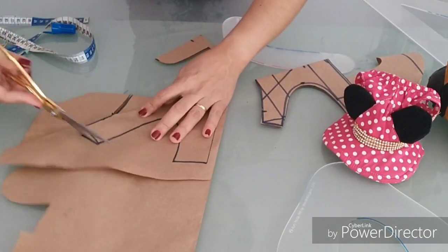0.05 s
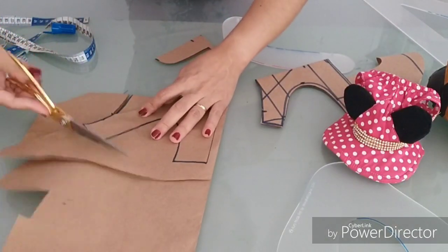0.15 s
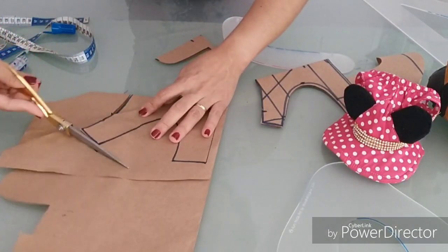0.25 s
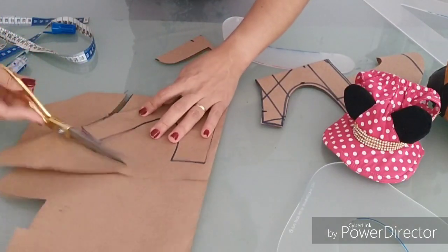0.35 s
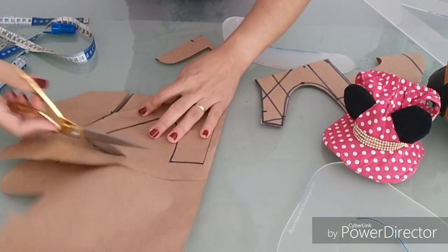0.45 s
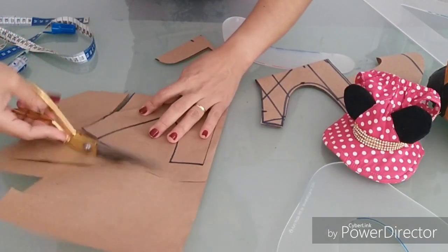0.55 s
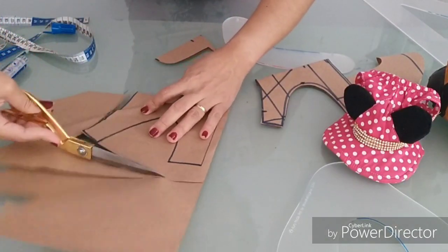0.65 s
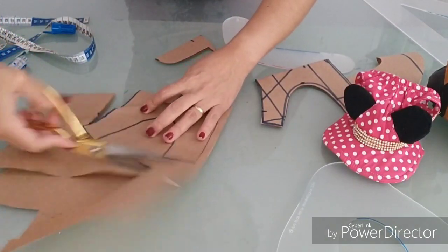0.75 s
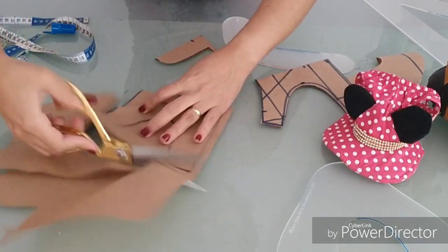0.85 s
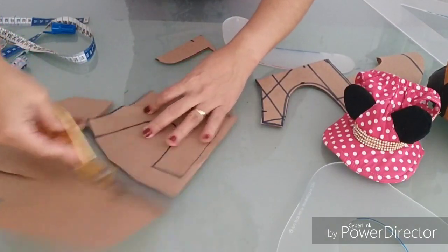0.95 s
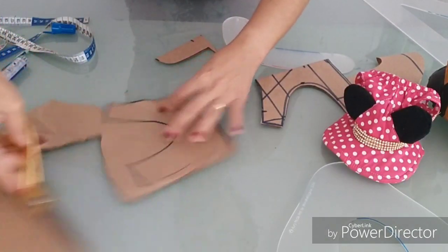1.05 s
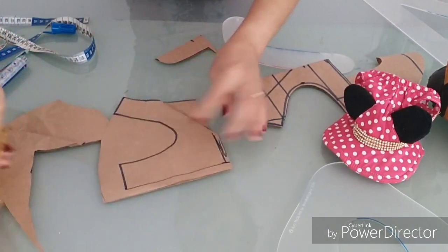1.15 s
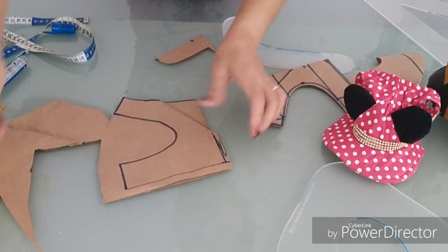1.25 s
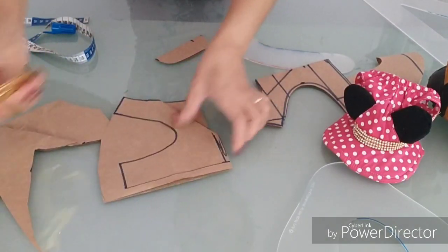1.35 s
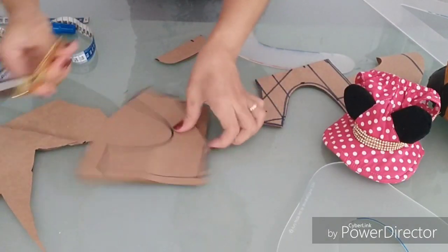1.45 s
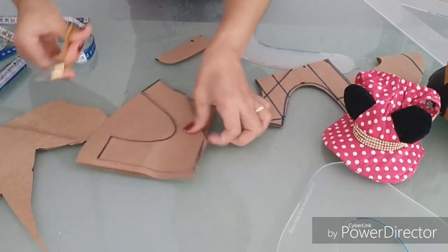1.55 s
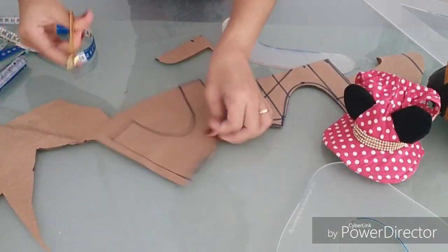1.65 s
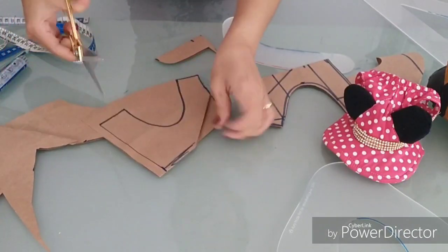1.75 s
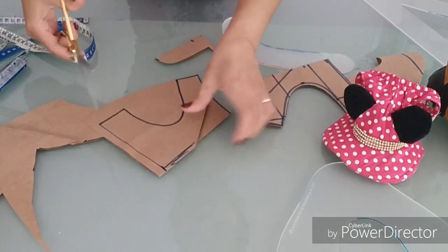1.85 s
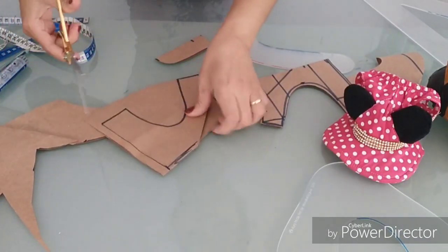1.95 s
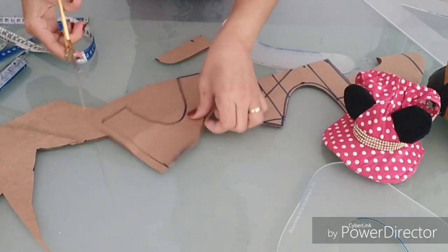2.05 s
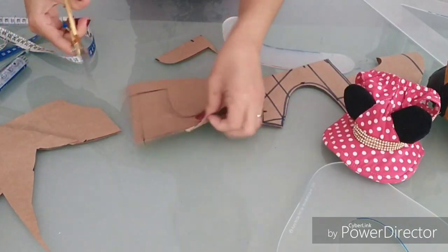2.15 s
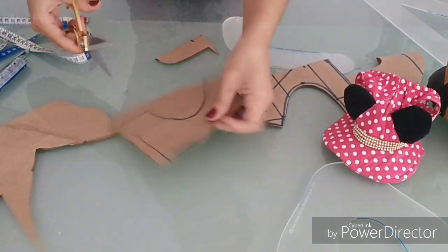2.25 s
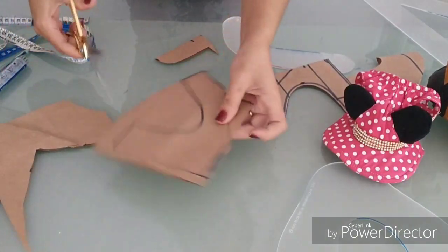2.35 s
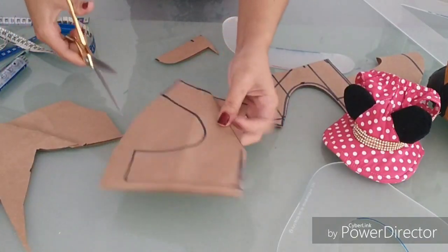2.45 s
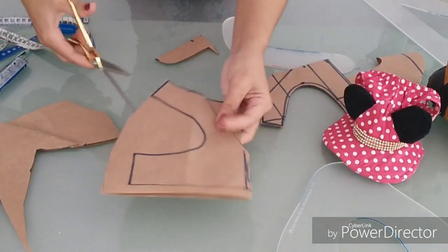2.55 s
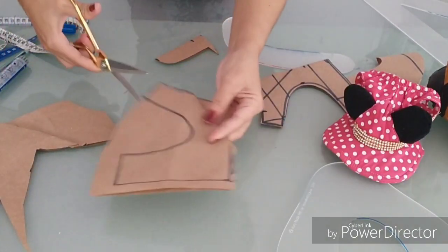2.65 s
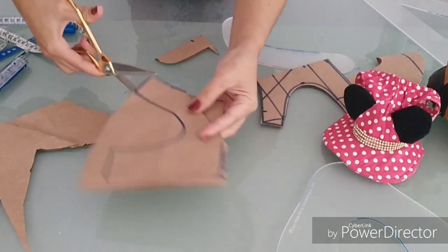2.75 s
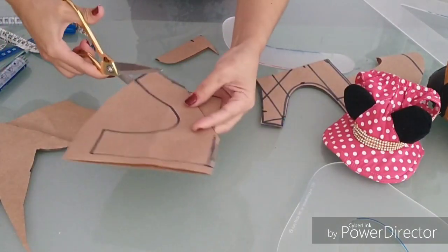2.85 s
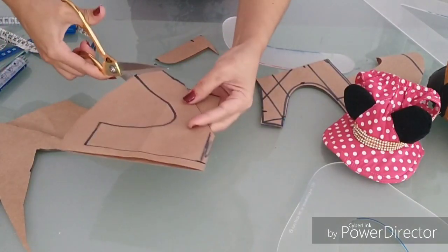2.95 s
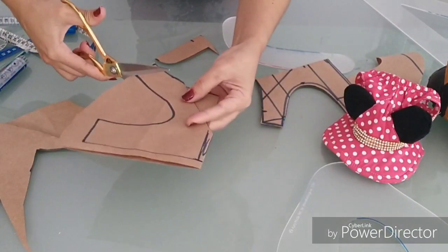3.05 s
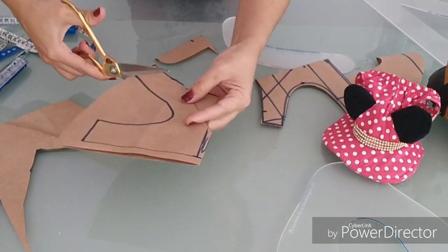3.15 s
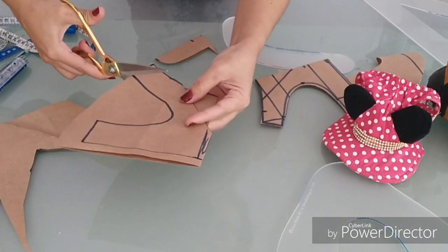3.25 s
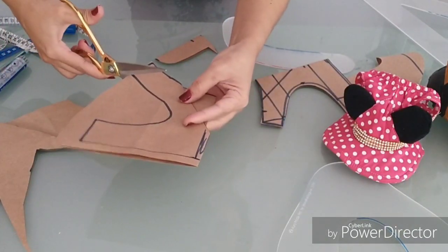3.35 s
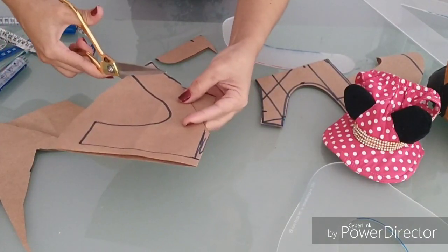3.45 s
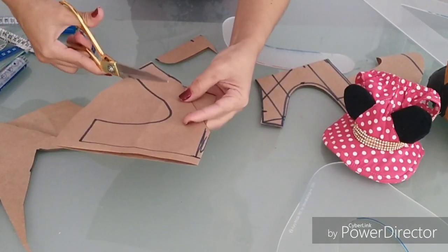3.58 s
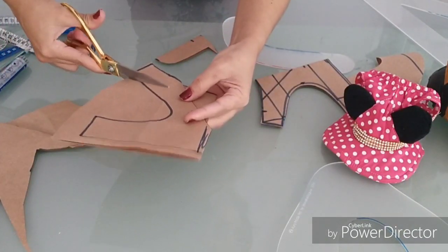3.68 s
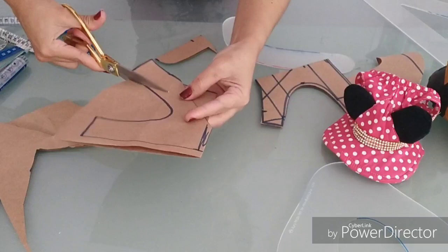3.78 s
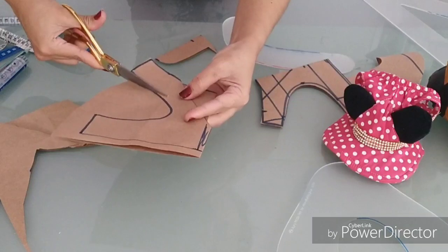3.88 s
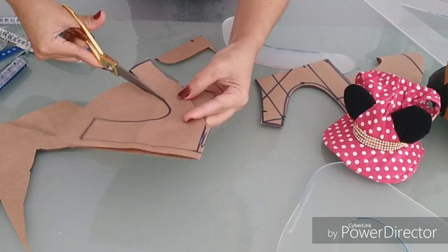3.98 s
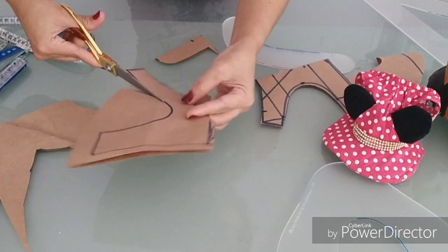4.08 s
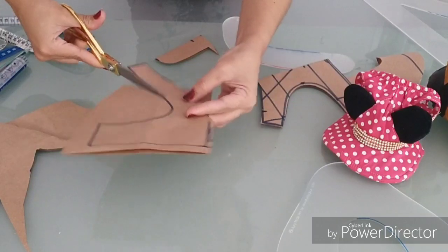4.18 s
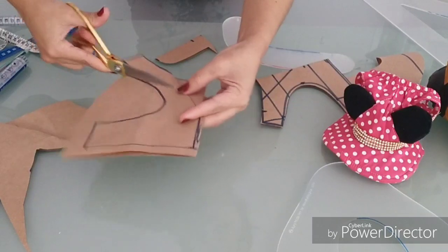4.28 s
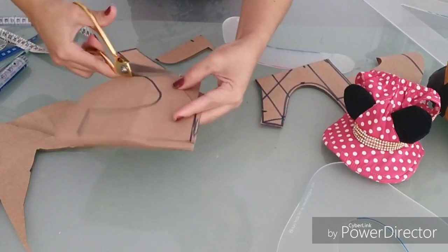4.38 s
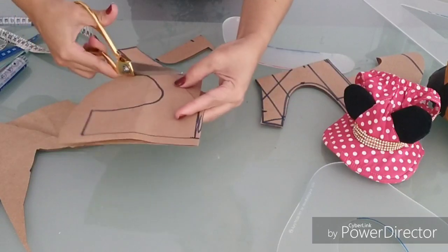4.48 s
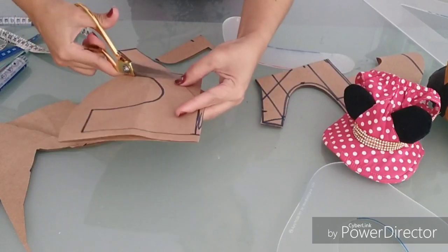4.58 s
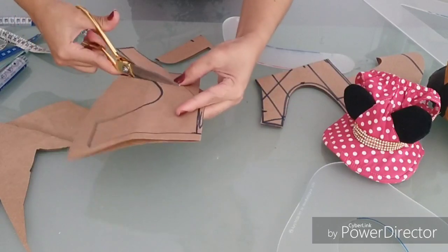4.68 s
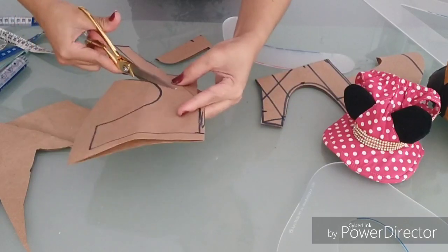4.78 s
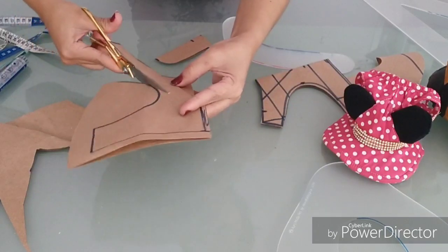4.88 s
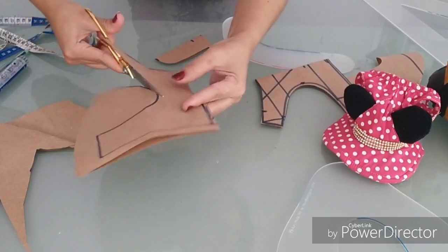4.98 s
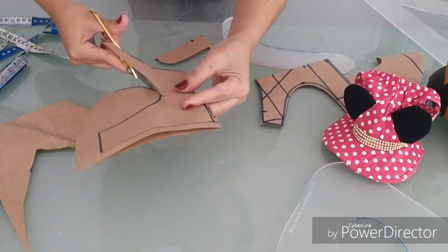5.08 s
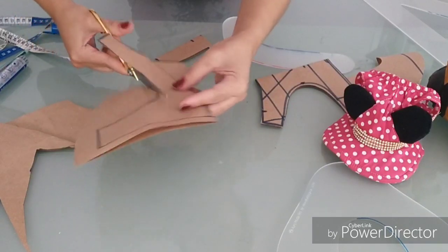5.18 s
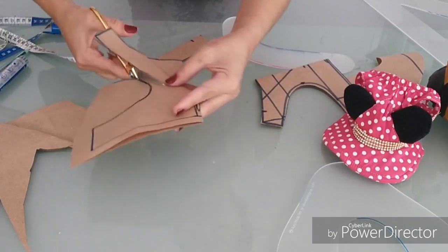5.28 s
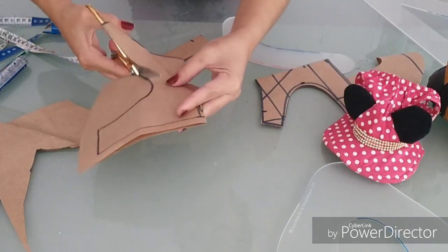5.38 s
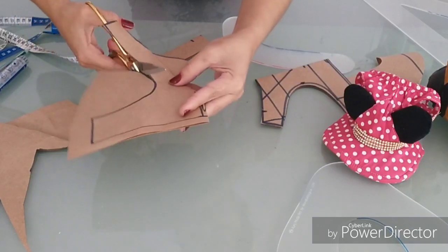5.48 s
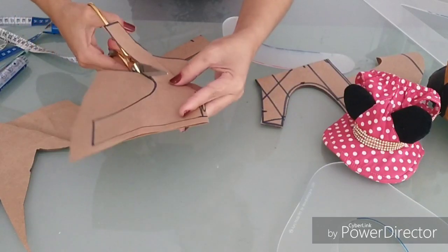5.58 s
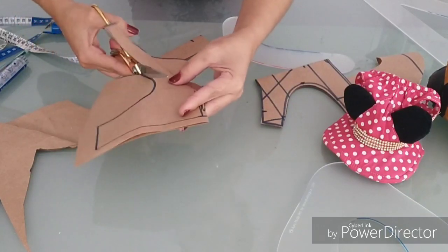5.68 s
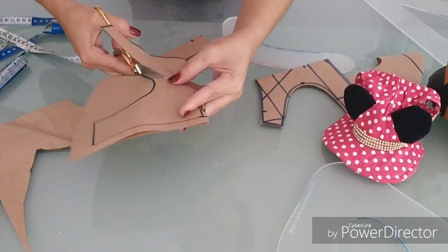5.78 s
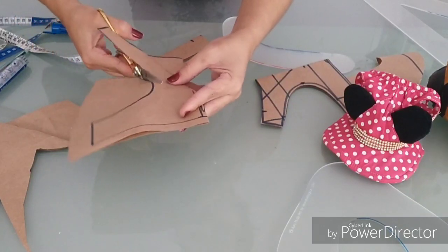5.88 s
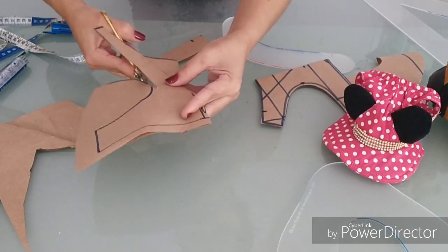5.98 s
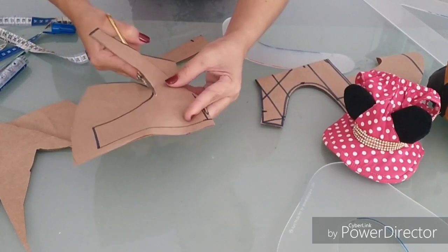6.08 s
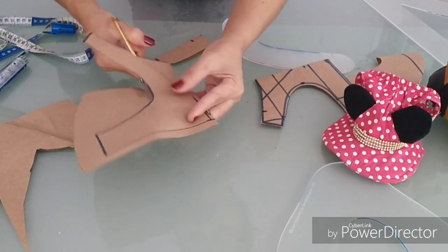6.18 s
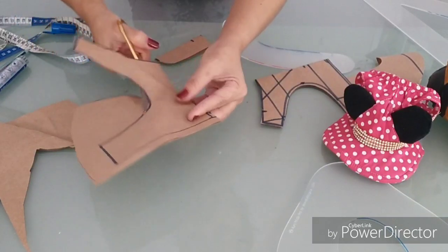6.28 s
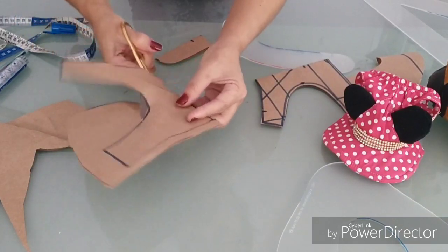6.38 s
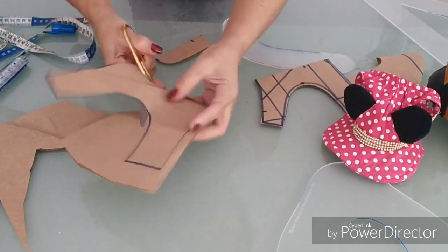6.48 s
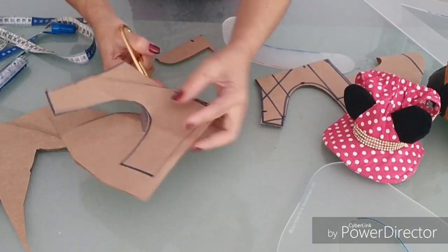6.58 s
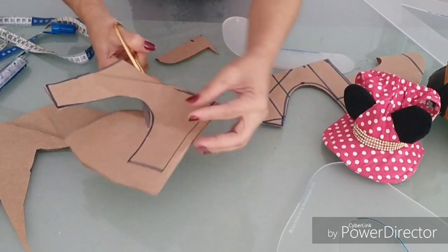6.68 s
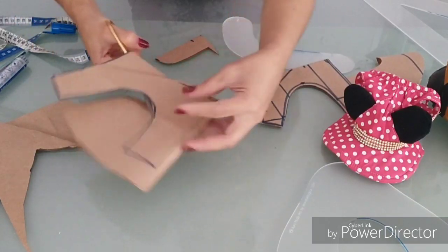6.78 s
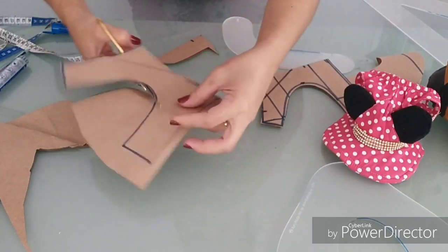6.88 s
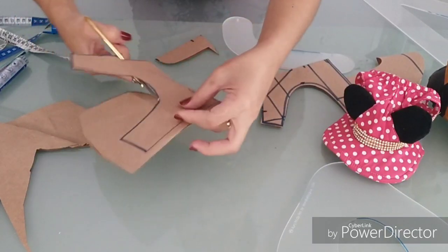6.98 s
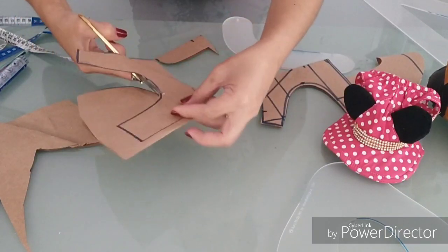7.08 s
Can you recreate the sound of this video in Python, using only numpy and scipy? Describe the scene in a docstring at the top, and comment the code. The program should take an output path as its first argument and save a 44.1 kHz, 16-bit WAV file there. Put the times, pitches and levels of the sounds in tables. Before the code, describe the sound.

Close up in a small room with soft hiss and faint fan-like hum, a stiff paper sheet rustles across a table and is sheared by three hard snips, a sharp knock with them. The offcut is brushed away, empty scissors click and rasp, the piece is handled quietly, and finally slow snips crunch gently in groups, with small paper snaps and thin metallic glides.

```python
"""Steel scissors cut folded kraft paper on a glass-topped table in a small, faintly humming room.
First the sheet slides and three hard cuts part it (fibre noise through sheet and table resonances);
the offcut is swept aside (rubbing noise); the empty blades are worked in the air (scrapes, ticks).
The piece is lifted with soft rubbing, a faint rumble passes, and slow cuts trim it with a soft crunch
(sparser fibre noise, jerks and crackles), between glides of the blades along the cut edge."""
import sys
import numpy as np
from scipy import signal
from scipy.fft import rfft, irfft
from scipy.io import wavfile

SR = 44100
rng = np.random.default_rng(int(sys.argv[2]) if len(sys.argv) > 2 else 0)


def master(y):
    """Save y as 16-bit WAV."""
    cut = np.clip(np.atleast_2d(y).T, -1, 1)
    pcm = np.round(cut * 32767)  # scale
    wavfile.write(sys.argv[1], SR, pcm.astype(np.int16))


N = 314251


def from_db(db):
    """Decibels to gain."""
    return 10 ** (np.asarray(db) / 20)


def rms_one(x):
    """Scale to unit rms."""
    return x / np.sqrt(np.mean(x ** 2) + 1e-20)


def at_hz(points, hz):
    """Read a table on a log-frequency axis."""
    knots, values = np.transpose(points)
    return np.interp(np.log(np.maximum(hz, 1)), np.log(knots), values)


def drift(knots_per_s):
    """Smooth chance: Gaussian knots joined by lines, unit rms."""
    knots = rng.standard_normal(N // 20)
    return rms_one(np.interp(np.arange(N) / SR * knots_per_s, np.arange(len(knots)), knots))


def resonate(x, hz, width_hz):
    """Two-pole resonance with gain 1 on top."""
    r = np.exp(-np.pi * width_hz / SR)
    zeros = np.array([1, 0, -1]) * (1 - r * r) / 2
    poles = [1, -2 * r * np.cos(2 * np.pi * hz / SR), r * r]
    return signal.lfilter(zeros, poles, x + 1e-18)


def resonate_twice(x, hz, stage_width_hz):
    """Two equal resonances in series: steeper skirts."""
    return resonate(resonate(x, hz, stage_width_hz), hz, stage_width_hz)


def butter(x, hz, kind, order=2):
    """Butterworth filter."""
    return signal.sosfilt(signal.butter(order, hz, kind, fs=SR, output="sos"), x)


def coloured(x, spectrum, size=4096):
    """Causal (minimum-phase) filter with the given spectrum."""
    hz = np.arange(size // 2 + 1) * SR / size
    cepstrum = irfft(np.log(from_db(at_hz(spectrum, hz))))
    # fold the cepstrum onto positive time
    cepstrum[1:size // 2] *= 2
    cepstrum[size // 2 + 1:] = 0
    impulse = irfft(np.exp(rfft(cepstrum)))
    return signal.fftconvolve(x, impulse)[:N]


def envelope(start, length, swell_db, attack_s, release_s):
    """A stroke sets in, swells or fades evenly while it lasts, then dies away."""
    age = np.maximum(np.arange(N) / SR - start, 0)
    rise = 1 - np.exp(-(age / attack_s) ** 2)
    fall = np.exp(-np.minimum(np.maximum(age - length, 0) / release_s, 20))
    return rise * fall * from_db(swell_db * (np.minimum(age / length, 1) - .5))


def strokes(rows, attack_s, release_s, lead_s=0):
    """Gains of body and hiss over a series of strokes; the hiss may set in earlier."""
    body_power, hiss_power = 0, 0
    for start, length, db, swell_db, hiss_db in rows:
        body = from_db(db) * envelope(start, length, swell_db, attack_s, release_s)
        early = from_db(db) * envelope(start - lead_s, length + lead_s, swell_db, attack_s, release_s)
        body_power = body_power + body ** 2
        hiss_power = hiss_power + (from_db(hiss_db) * early) ** 2
    return np.sqrt(body_power), np.sqrt(hiss_power)


def fibres(per_s, spread_db, clump_db, clump_rate, rub_db):
    """Fibres break or slip at random, over smooth rubbing noise, both waxing and waning in clumps."""
    sizes = from_db(spread_db * np.clip(rng.standard_normal(N), -2, 2)) * rng.choice([-1, 1], N)
    breaks = rms_one(sizes * (rng.random(N) < per_s / SR))
    rub = from_db(rub_db) * rng.standard_normal(N)
    clumps = from_db(clump_db * np.clip(drift(clump_rate), -2, 2))
    return (breaks + rub) * clumps


def with_modes(force, modes):
    """Raise or lower the force by the listed dB at each mode."""
    return force + sum((from_db(db) - 1) * resonate(force, hz, width) for hz, width, db in modes)


def play(gains, force, colour, splits_hz):
    """The contact force rings through its colour; each register follows its own gain."""
    rest, registers = coloured(force, colour), []
    for hz in splits_hz:
        registers.append(butter(butter(rest, hz, "low"), hz, "low"))
        rest = butter(butter(rest, hz, "high"), hz, "high")
    registers.append(rest)
    return sum(gain * rms_one(x) for gain, x in zip(gains, registers))


# air noise spectrum: f/Hz, relative density/dB
AIR_COLOUR = [(25, -18), (60, -7), (140, -0.5), (280, -11), (900, -9), (1300, -14), (3200, -23.5),
              (5000, -21.5), (6700, -23.5), (9000, -18), (11000, -8), (13000, -16.5), (15500, -31)]
# wavering hum resonances: f/Hz, half stage width/Hz, rms level/dB
HUM_RESONANCES = [(166, 33, -82), (406, 29.5, -72), (537.3, 8.05, -77.5), (689, 27.3, -76.5),
                  (773.5, 12, -69.5), (851, 7.6, -72.5)]
# steady hum tones: f/Hz, rms level/dB
HUM_TONES = [(782, -73), (841, -75.5)]
# passing rumble: t/s, length/s, level/dB, f/Hz, stage width/Hz
RUMBLE = (3.5, 0.8, -75, 55, 25)
AIR_DB = -63.5


def room_tone():
    """Soft hiss, a fan-like hum of narrow noise around two steady tones, and a passing rumble."""
    air = from_db(AIR_DB) * rms_one(coloured(rng.standard_normal(N), AIR_COLOUR))
    hum = 0
    for hz, half_width, db in HUM_RESONANCES:
        hum = hum + from_db(db) * rms_one(resonate_twice(rng.standard_normal(N), hz, 2 * half_width))
    for hz, db in HUM_TONES:
        hum = hum + from_db(db) * rms_one(np.sin(2 * np.pi * hz * np.arange(N) / SR))
    start, length, db, hz, width = RUMBLE
    rumble = from_db(db) * rms_one(resonate_twice(rng.standard_normal(N), hz, width))
    return air + hum + rumble * envelope(start, length, swell_db=-1, attack_s=0.23, release_s=.2)


# room decay: f/Hz, t60/s
ROOM_T60 = [(150, 0.58), (800, 0.51), (2000, 0.34), (5000, 0.38), (14000, 0.36)]
ROOM_BUILD_S = 0.0015


def room_tail(size=32768):
    """A diffuse noise tail whose bass lingers longest; energy 1."""
    t, hz = np.arange(size) / SR, np.arange(size // 2 + 1) * SR / size
    noise, tail = rfft(rng.standard_normal(size)), 0
    for band_hz, t60 in ROOM_T60:
        share = at_hz([(f, float(f == band_hz)) for f, _ in ROOM_T60], hz)
        tail = tail + irfft(noise * share) * from_db(-60 * t / t60)
    build = 1 - np.exp(-(t / ROOM_BUILD_S) ** 2)
    return rms_one(tail * build) / np.sqrt(size)


ROOM_DB, MOVES_PER_S = -6, 9


def room(x, count=3):
    """Sheet and blades keep moving, so their sound wanders between several sets of reflections."""
    shares = np.array([drift(MOVES_PER_S) for _ in range(count)])
    shares /= np.sqrt(np.sum(shares ** 2, axis=0))
    reflections = sum(signal.fftconvolve(x * share, room_tail())[:N] for share in shares)
    return x + from_db(ROOM_DB) * reflections


# soft rubbing of fingers on the piece, and of blades entering the paper at 3.525 s:
# t/s, length/s, level/dB, swell/dB, hiss re level/dB
SOFT_RUBS = [(2.37, 0.2, -64.5, -2, 4.5), (2.51, 0.32, -66, 6, 4.5), (2.765, 0.025, -51, -9, 4),
             (2.815, 0.065, -67, -4, 18), (2.9, 0.19, -76.5, 4, 11.5), (3.525, 0.24, -58, 10, 0.5),
             (5.71, 0.086, -60, 4.5, -0.5), (5.82, 0.24, -68, 6, 6)]
# soft-rubbing spectrum: f/Hz, relative density/dB
SOFT_COLOUR = [(530, -70), (900, -0.5), (1190, -3.5), (1370, -1), (1880, 0), (3190, -19), (4520, -2.5),
               (5100, -3.5), (7490, -4.5), (11600, 2.5), (13700, -1.5), (16000, -15)]


def soft_rubs():
    """Fingers on the piece, once blades entering it, rub softly: dense slips over weak smooth noise."""
    force = fibres(per_s=3200, spread_db=2.5, clump_db=1.0, clump_rate=90, rub_db=-9.0)
    return play(strokes(SOFT_RUBS, attack_s=.018, release_s=0.049), force, SOFT_COLOUR, [4500])


# steel rubs steel as the empty blades open and close: t/s, length/s, level/dB, swell/dB, hiss re level/dB
SCRAPES = [(1.447, 0.014, -44.5, 2, -7), (1.487, 0.041, -57, 8, 11.5), (1.64, 0.03, -55, -4, 11.5),
           (1.675, 0.1, -49, -2.5, -5), (1.97, 0.11, -66.5, -5.5, 4.5), (2.125, .07, -75, 5, 20),
           (2.2, 0.17, -60, 16, 1), (2.333, 0.039, -50, -4, -3)]
# steel-on-steel spectrum: f/Hz, relative density/dB
SCRAPE_COLOUR = [(590, -24.5), (1000, -13), (1730, -9.5), (1870, -4.5), (2280, -12), (2740, -4.5),
                 (4680, -1.5), (8650, -13), (12400, -8.5), (14800, -19), (16000, -27)]


def scrapes():
    """Steel rubs on steel: dense, very uneven slips."""
    force = fibres(per_s=4400, spread_db=7.0, clump_db=2.0, clump_rate=290, rub_db=-3)
    return play(strokes(SCRAPES, attack_s=0.0043, release_s=0.026), force, SCRAPE_COLOUR, [6500])


# blades reopen and glide along the cut edge: t/s, length/s, level/dB, swell/dB, hiss re level/dB
GLIDES = [(4.228, .15, -54.5, 10.5, 6), (4.385, 0.058, -48, 6, 3), (5.21, 0.093, -52, 18, 3.5),
          (5.305, 0.048, -52.5, 0.5, 7.5), (5.455, .055, -52.5, -2.5, 1.5)]
# steel-on-edge spectrum: f/Hz, relative density/dB
GLIDE_COLOUR = [(260, -67), (450, -21), (530, -17), (607, -16.5), (856, -2.5), (1150, -6.5), (1400, -3.5),
                (2040, -4), (2580, -12), (4110, 4), (5380, 1), (8540, -1), (11300, 5), (14800, -0.5),
                (16000, -26)]


def glides():
    """Steel rubs along the cut edge: the densest slips, the hiss leading slightly."""
    force = fibres(per_s=6200, spread_db=6.5, clump_db=1.8, clump_rate=150, rub_db=0.0)
    gains = strokes(GLIDES, attack_s=0.023, release_s=0.037, lead_s=0.0042)
    return play(gains, force, GLIDE_COLOUR, [2700])


# the sheet slides over table and blades: t/s, length/s, level/dB, swell/dB, hiss re level/dB
SLIDES = [(0.0, 0.41, -47.5, 1, -0.5), (0.32, 0.083, -42.5, -8, -14.5), (0.408, .03, -37.5, -0.5, 0.5),
          (0.46, 0.15, -43, 2, 2.5), (0.705, 0.06, -40.5, 6, -18), (0.755, 0.084, -37.5, -3, 0.5),
          (0.815, 0.088, -33.5, -4, 3.5), (1.03, 0.018, -35.5, 3, -2.5), (1.09, 0.14, -51, -4.5, 5.5),
          (1.258, 0.053, -43.5, 9, -10)]
# paper-on-table spectrum: f/Hz, relative density/dB
SLIDE_COLOUR = [(150, -39.5), (250, -19.5), (393, -4), (484, -13.5), (547, -11.5), (938, -8.5), (1160, -9),
                (1260, -8.5), (1450, -1.5), (1910, 1), (6040, -2), (9010, -10.5), (10900, -2),
                (14900, -12.5), (16000, -10.5)]


def slides():
    """Paper rubs on table and blades: sparse slips under strong smooth noise."""
    force = fibres(per_s=1100, spread_db=3.0, clump_db=0.5, clump_rate=210, rub_db=3.5)
    return play(strokes(SLIDES, attack_s=0.015, release_s=.02), force, SLIDE_COLOUR, [6500])


# singing edges: t/s, half length to 1/e /s, f/Hz, glide/(octaves/s), width/Hz, level/dB
SQUEAKS = [(0.071, .015, 1500, -1.5, 96, -48), (0.272, 0.035, 1733, 1, 664, -34),
           (0.504, 0.065, 2883, -3.5, 1040, -38.5), (0.347, 0.039, 520, -0.5, 150, -49),
           (0.678, 0.014, 620, 5.5, 296, -41.5), (0.685, 0.026, 5260, 1.5, 1200, -32.5),
           (0.846, 0.023, 4590, -6.5, 1387, -30), (0.876, 0.01386, 1920, -2.5, 196.5, -25),
           (2.223, 0.019, 3940, -4.5, 600, -55.5), (2.976, .02, 4300, -2, 700, -56),
           (5.337, 0.038, 4090, 0, 1000, -47.5)]


def squeaks():
    """Stick-slip of a rubbing edge: a narrow noise band whose pitch slides with the contact point."""
    out = np.zeros(N)
    for s, half, hz, glide, width_hz, db in SQUEAKS:
        at = np.arange(max(0, int((s - .15) * SR)), int((s + .15) * SR))
        t = at / SR - s
        noise = rng.standard_normal(SR // 2) + 1j * rng.standard_normal(SR // 2)
        slips = butter(noise, width_hz / 2, "low")[-len(at):]
        pitch_hz = hz * 2 ** (glide * np.clip(t, -2 * half, 2 * half))
        phase = 2 * np.pi * np.cumsum(pitch_hz) / SR
        tone = rms_one(np.real(slips * np.exp(1j * phase)))
        out[at] += from_db(db) * np.exp(-(t / half) ** 2) * tone
    return out


def clicks(rows, contact_s, quality, crack_hz, low_cut, size=2048):
    """Each contact is a brief shudder that rings one broad resonance and adds a bright crack."""
    out, age = np.zeros(N + SR), np.arange(size) / SR / contact_s
    force = age * np.exp(1 - age)
    for (s, level_db, hz, crack_db), shudder in zip(rows, rng.choice([-1., 1.], (len(rows), size))):
        ring = resonate_twice(shudder * force, hz, hz / quality)
        crack = butter(butter(shudder * force, crack_hz, "high", order=1), 12000, "low")
        click = rms_one(ring) + from_db(crack_db) * rms_one(crack)
        # a small part radiates little below its own ring
        click = butter(click, low_cut * np.clip(hz, 1400, 4500), "high", order=3)
        start = round(s * SR)
        out[start:start + size] += from_db(level_db) * rms_one(click) * np.sqrt(np.mean(force ** 2))
    return out[:N]


# blade and pivot knocks: t/s, level/dB, ring f/Hz, crack re ring/dB
BLADE_TICKS = [(0.434, -19.5, 4100, -1.5), (0.758, -29, 5090, 21), (1.01, -26, 3860, 9),
               (1.12, -30, 3300, 3), (1.262, -34, 5320, 16), (1.45, -37, 4460, -10),
               (1.495, -34.5, 4700, 0), (1.701, -39, 3400, 3), (1.736, -26.5, 4270, 1.5),
               (2.026, -48, 10600, 8), (2.337, -30, 10900, 6), (2.729, -38, 11600, -33),
               (2.959, -36, 4660, -16), (5.762, -40.5, 10830, -1), (6.436, -32.5, 4234, -0.5),
               (6.934, -36.5, 11300, 6)]


def blade_ticks():
    """Blades and pivot knock: short contact, tighter ring."""
    return clicks(BLADE_TICKS, contact_s=0.00097, quality=3.2, crack_hz=2500, low_cut=0.55)


# paper snaps and buckles: t/s, level/dB, ring f/Hz, crack re ring/dB
PAPER_SNAPS = [(0.122, -36, 2320, -17), (0.239, -28, 1780, -10), (0.607, -23, 1860, -11),
               (0.672, -33, 1770, 10), (1.304, -27, 1880, -8.5), (2.337, -40.5, 1700, -25),
               (2.637, -46.5, 1350, -4), (2.776, -41.5, 1500, 1.5), (3.744, -40, 1500, 6.5),
               (3.78, -38.5, 1500, 7), (3.857, -39.5, 1200, 2), (3.912, -36, 1830, 4),
               (3.949, -36.5, 1180, -1), (3.975, -35, 1852, -6), (4.001, -47, 1680, 9),
               (4.034, -34, 1270, 2), (4.084, -41, 2000, 4), (4.116, -41.5, 1547, 8), (4.159, -50, 800, 6),
               (4.945, -48.5, 887, 1), (5.126, -45, 1430, 16), (5.294, -50, 1830, -3),
               (5.791, -44, 1596, 27), (6.471, -34.5, 870, -23.5), (6.911, -36.5, 1717, -5),
               (6.979, -33, 935, 3)]


def paper_snaps():
    """Paper snaps and buckles: longer contact, heavily damped ring."""
    return clicks(PAPER_SNAPS, contact_s=0.0017, quality=1.0, crack_hz=1500, low_cut=0.58)


BITE_ATTACK_S, BITE_RELEASE_S = 0.022, 0.032
CRACKLE_SPREAD_DB, CRACKLE_HZ, CRACKLE_CRACK_DB = 8, 1500, -4.5


def crackles(cuts, per_s, above_db, count=16):
    """Small fibre bundles snap at random once the blades have bitten, levels following the cut's."""
    rows = []
    for start, length, db, *_ in cuts:
        ages = BITE_ATTACK_S + np.cumsum(rng.uniform(.2, 1.8, count)) / per_s
        chances = rng.uniform(-1, 1, (count, 2))
        for age, (strength, pitch) in zip(ages, chances):
            if age < length:
                level_db = db + above_db + CRACKLE_SPREAD_DB * strength
                rows.append((start + age, level_db, CRACKLE_HZ * 2 ** (.5 * pitch), CRACKLE_CRACK_DB))
    return clicks(rows, contact_s=0.001, quality=1.2, crack_hz=1500, low_cut=0.62)


# sheet resonances that swell and shrink: f/Hz
BENDING_HZ = [1000, 1450, 2000, 3500, 4700]
BENDING_QUALITY, BENDS_PER_S = 4, 16


def bending(force, depth):
    """The colour shifts as the sheet flexes under the blades."""
    return force + sum(depth * drift(BENDS_PER_S) * resonate(force, hz, hz / BENDING_QUALITY)
                       for hz in BENDING_HZ)


# pushes through the lifted piece: t/s, length/s, level/dB, swell/dB, hiss re level/dB
SLOW_CUTS = [(3.69, 0.13, -57.5, 6, -2), (3.815, 0.055, -53, 3, -3), (3.91, 0.079, -48.5, -5, -2.5),
             (4.025, .14, -58.5, -3, 1.5), (4.588, 0.124, -50.5, 7.5, -7), (4.728, 0.24, -55.5, -2.5, -4.5),
             (4.98, 0.14, -51, 7.5, -2.5), (5.965, 0.18, -55, 6, -2), (6.165, .1, -53.5, 9.5, -2),
             (6.297, 0.27, -53.5, -3, 0), (6.83, 0.069, -54, 13, 4), (6.936, 0.16, -52, 1, -3.5)]
# slow-cut spectrum: f/Hz, relative density/dB
SLOW_COLOUR = [(260, -40), (450, -24), (530, -6), (589, -14.5), (759, 0.5), (1020, -2.5), (1380, 0),
               (2010, -3), (2790, -13), (3810, -3), (5790, -12.5), (8930, -11.5), (12200, -3.5),
               (14800, -14.5), (16000, -15)]
# resonance and hollows of the lifted sheet: f/Hz, width/Hz, gain/dB
LIFTED_MODES = [(870, 73, 2.5), (2360, 360, -4.5), (3960, 840, -1)]
HISS_LEAD_S = .034  # the blades hiss against each other before they bite
BLADE_DB = -1  # the blades' rasp re the sheet's crunch


def slow_cuts():
    """Slow shearing tears fibres bundle by bundle: a soft crunch, in jerks as the blades catch and give."""
    force = fibres(per_s=700, spread_db=0.5, clump_db=2.1, clump_rate=150, rub_db=1.5)
    jerks = from_db(1.13 * np.clip(drift(55), -2, 2))
    force = bending(with_modes(force * jerks, LIFTED_MODES), depth=0.37)
    sheet, hiss = strokes(SLOW_CUTS, BITE_ATTACK_S, BITE_RELEASE_S, HISS_LEAD_S)
    return play([sheet, from_db(BLADE_DB) * sheet, hiss], force, SLOW_COLOUR, [2700, 6500])


# cuts with the sheet on the table: t/s, length/s, level/dB, hiss re level/dB, hiss growth as blades shut/dB
HARD_CUTS = [(0.239, 0.07, -31.5, -0.5, 12.5), (0.602, .085, -28.5, -5.5, -4.5),
             (0.912, 0.1, -28.5, -3, 18)]
# hard-cut spectrum: f/Hz, relative density/dB
HARD_COLOUR = [(53, -58), (90, -18.5), (323, -17), (448, -12), (633, -6), (839, -11.5), (1910, 2),
               (2130, 2), (4450, 0), (4960, -2), (6160, -7), (9110, -10.5), (11300, -5), (15000, -14.5),
               (16000, -27)]
# resonances of the sheet lying on the table: f/Hz, width/Hz, gain/dB
SHEET_MODES = [(337, 50, 8.5), (620, 50, 3), (1445, 104, 2.5), (1817, 53, 5), (2400, 170, -3.5),
               (4900, 640, 0), (10800, 990, 1.5)]
CUT_ATTACK_S, CUT_RELEASE_S, CUT_SWELL_DB = 0.0082, 0.029, 1.5
TABLE_DB = -13  # the table's boom re the cut


def hard_cuts():
    """Fast shearing breaks thousands of fibres a second, and the sheet and table resound."""
    force = fibres(per_s=3500, spread_db=6.0, clump_db=2.2, clump_rate=280, rub_db=2)
    force = bending(with_modes(force, SHEET_MODES), depth=0.14)
    sheet, hiss = 0, 0
    for start, length, db, hiss_db, growth_db in HARD_CUTS:
        sheet = sheet + from_db(db) * envelope(start, length, CUT_SWELL_DB, CUT_ATTACK_S, CUT_RELEASE_S)
        hiss_shape = envelope(start, length, growth_db, CUT_ATTACK_S, release_s=0.013)
        hiss = hiss + from_db(db + hiss_db) * hiss_shape
    return play([from_db(TABLE_DB) * sheet, sheet, hiss], force, HARD_COLOUR, [1100, 6500])


# two bands where left and right differ: f/Hz, stage width/Hz, share to the left
SIDE_BANDS = [(1880, 280, 0.41), (9920, 660, -.3)]
MIC_NOISE_DB = -93.5


def scene():
    """Scissors and paper in the room, heard by two closely spaced microphones."""
    rubbing = soft_rubs() + scrapes() + glides() + slides()
    contacts = squeaks() + blade_ticks() + paper_snaps()
    snapping = crackles(HARD_CUTS, per_s=55, above_db=-3) + crackles(SLOW_CUTS, per_s=34, above_db=5)
    dry = rubbing + contacts + snapping + slow_cuts() + hard_cuts()
    mid = room_tone() + room(dry)
    mic_noise = from_db(MIC_NOISE_DB) * rms_one(butter(rng.standard_normal(N), 312, "low", order=1))
    side = mic_noise + sum(share * resonate_twice(mid, hz, width) for hz, width, share in SIDE_BANDS)
    return np.array([mid + side, mid - side])


CUTOFF_HZ = 15900


def record(dry):
    """The top is cut steeply."""
    return signal.sosfilt(signal.ellip(12, .1, 80, CUTOFF_HZ, fs=SR, output="sos"), dry)


dry = scene()
out = record(dry)
master(out)
```